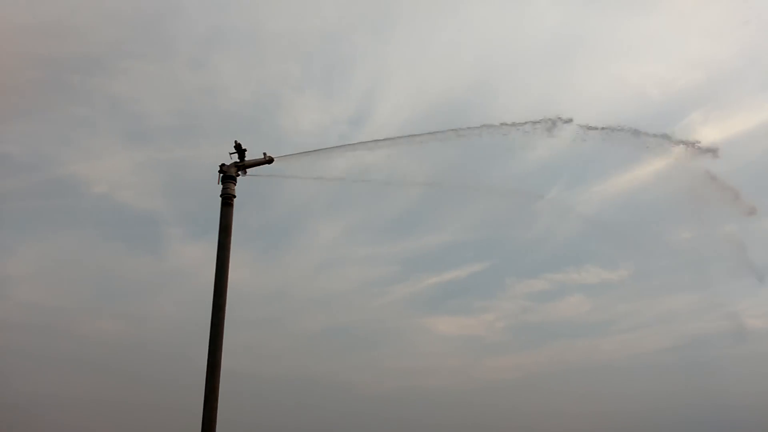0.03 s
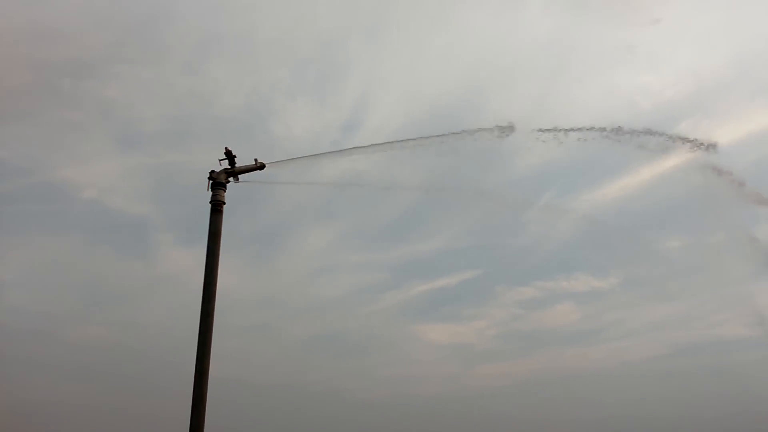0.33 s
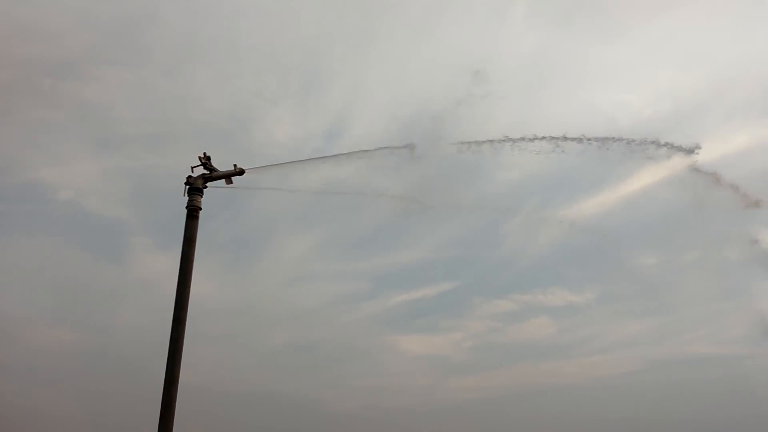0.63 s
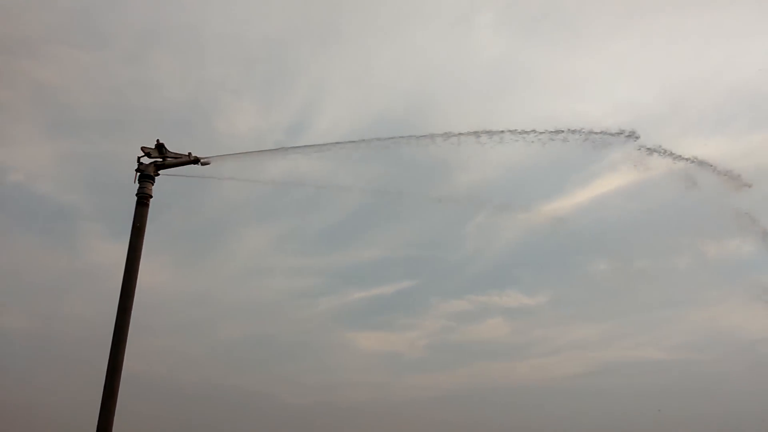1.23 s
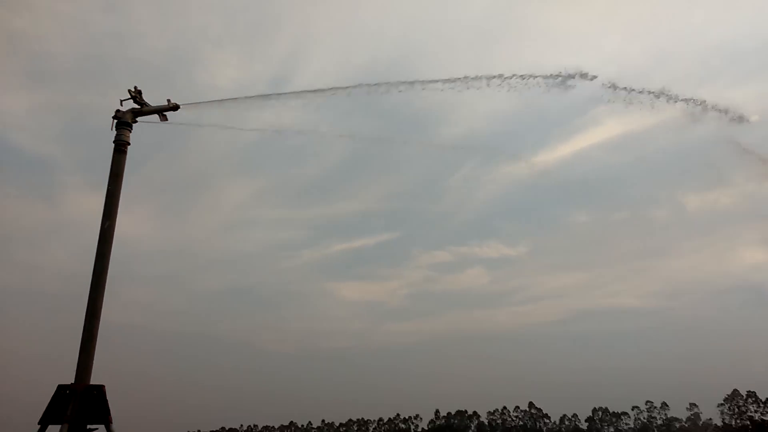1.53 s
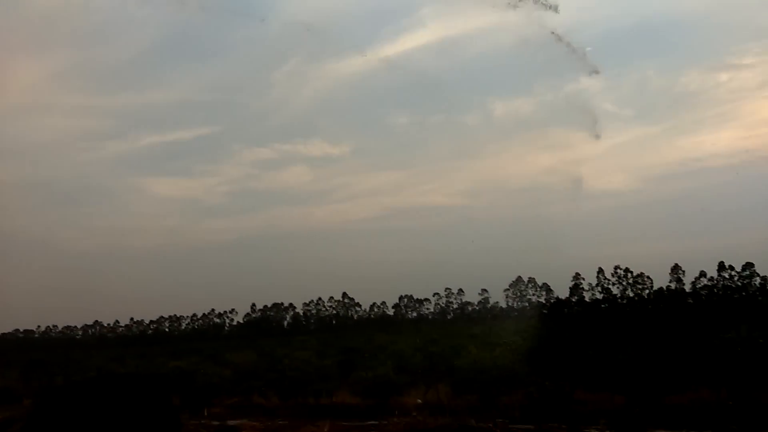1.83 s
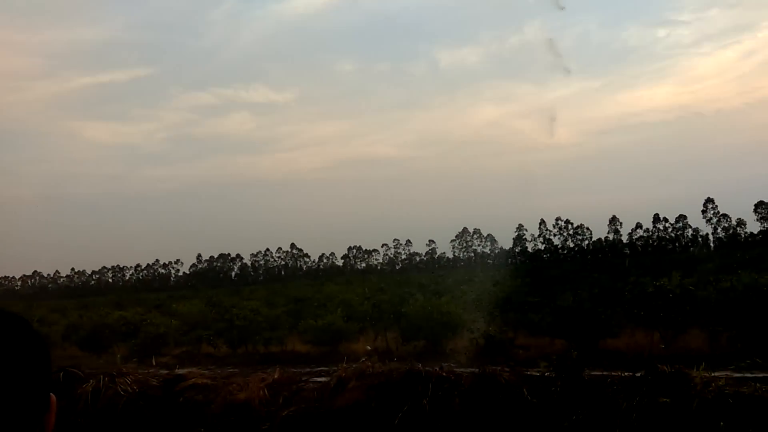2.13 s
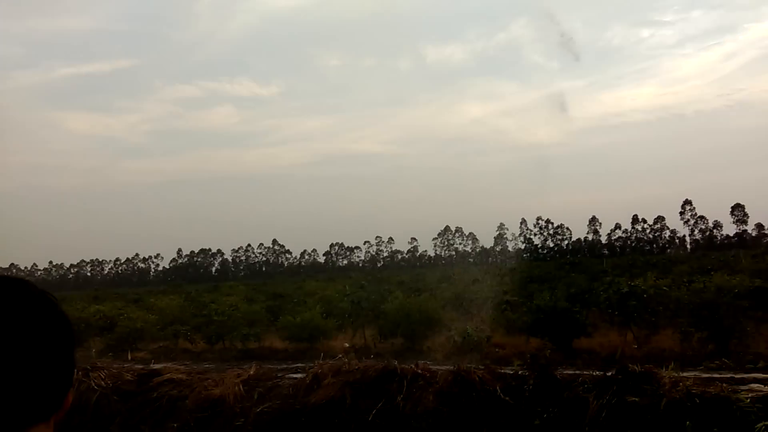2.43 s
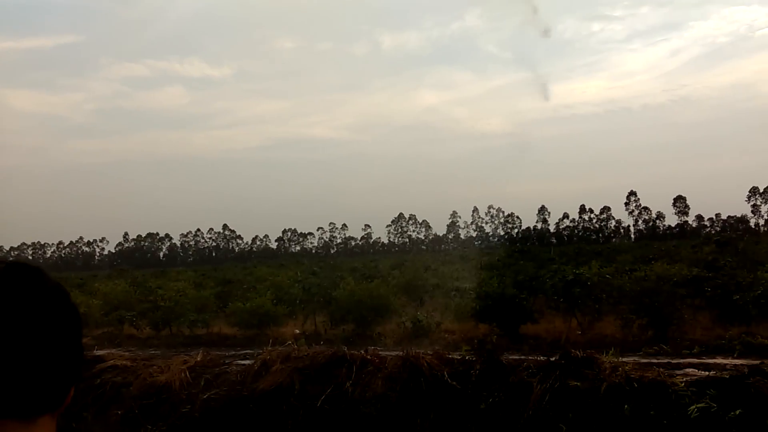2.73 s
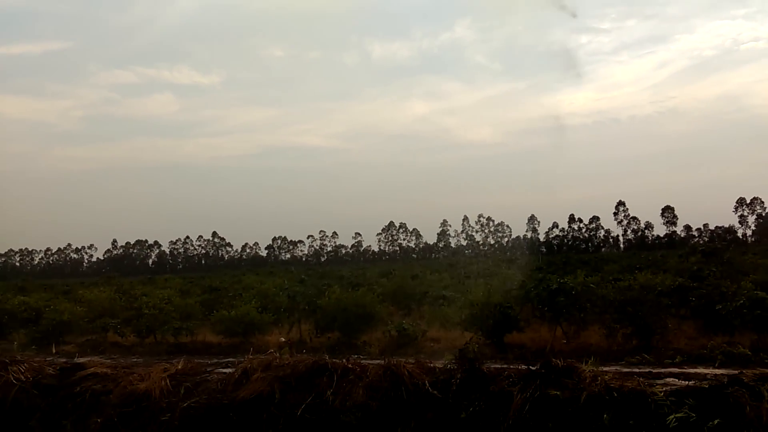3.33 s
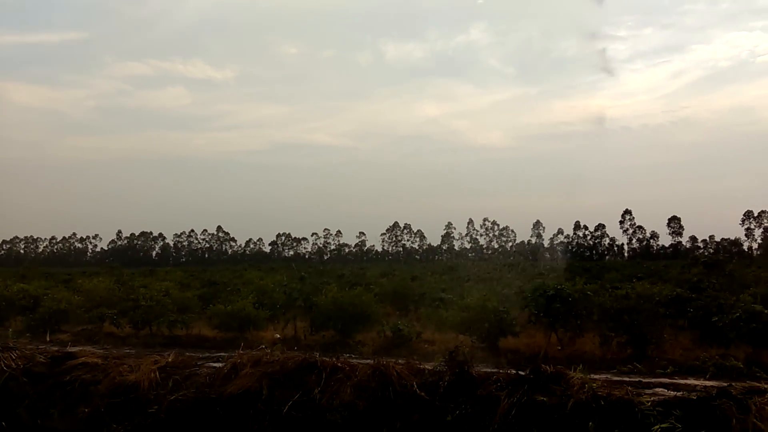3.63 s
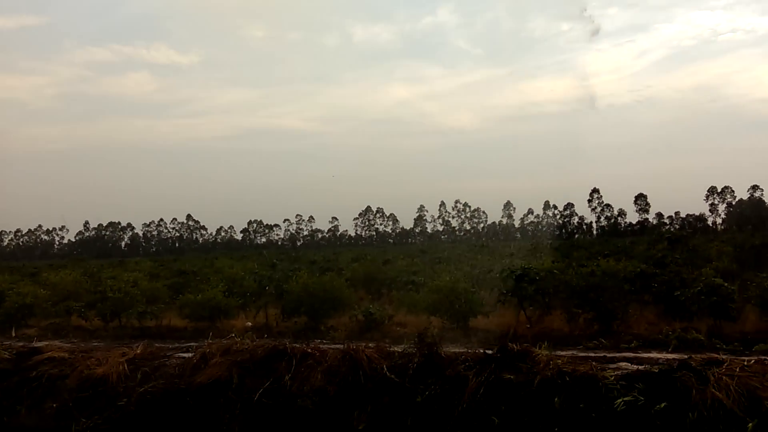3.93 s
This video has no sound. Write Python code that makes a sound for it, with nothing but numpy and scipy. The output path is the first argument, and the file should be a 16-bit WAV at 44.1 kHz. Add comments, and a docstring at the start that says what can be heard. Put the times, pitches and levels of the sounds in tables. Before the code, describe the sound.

An impact sprinkler in an open field strikes about three times a second, each blow a wet slap with a short metallic ring. Its jet hisses throughout, while an engine chugs some way off over a low outdoor rumble.

```python
"""Impact sprinkler in an open field

About three times a second the arm of a big sprinkler on a pole slaps into the jet, strikes the metal
head and rebounds once. Each blow is a noise burst of drops plus the ringing modes of the metal; both
change colour as the head slowly turns away. The jet hisses throughout, the open air rumbles, and a
four-cylinder engine, probably the pump, chugs some way off in harmonics of its cycle rate."""
import sys
import numpy as np
from scipy import signal
from scipy.fft import rfft, irfft
from scipy.io import wavfile

SR = 44100
rng = np.random.default_rng(int(sys.argv[2]) if len(sys.argv) > 2 else 0)


def master(y):
    """Save y as 16-bit WAV."""
    cut = np.clip(np.atleast_2d(y).T, -1, 1)
    pcm = np.round(cut * 32767)  # scale
    wavfile.write(sys.argv[1], SR, pcm.astype(np.int16))


N = 176400
TIME = np.arange(N) / SR
FREQ = np.maximum(np.arange(N // 2 + 1) * SR / N, 1)
LAG_NEAR_S, LAG_TURNED_S, ENGINE_LAG_S = .00042, .00028, .00038   # left channel behind right
CYCLE_HZ = 12.259
ENGINE_CYCLES = (TIME - .0025) * CYCLE_HZ


def from_db(db):
    """Amplitude ratio: a factor of ten per 20 dB."""
    return 10 ** (np.asarray(db) / 20)


def unit_rms(x):
    """Normalisation to unit mean power."""
    return x / np.sqrt(np.mean(x ** 2) + 1e-20)


def spectrum(points):
    """Interpolation of (frequency, level) points on a logarithmic frequency axis."""
    hz, db = np.transpose(points)
    return np.interp(np.log(FREQ), np.log(hz), db)


def coloured(x, curve_db):
    """Minimum-phase filtering: folding the cepstrum gives a gain curve its causal response."""
    cepstrum = irfft(np.log(from_db(curve_db)), N)
    cepstrum[1:N // 2] *= 2
    cepstrum[N // 2 + 1:] = 0
    response = irfft(np.exp(rfft(cepstrum)), N)[:N // 16]
    return signal.fftconvolve(x, response[None], axes=1)[:, :N]


def drift(hz):
    """Random modulation: low-passed noise of unit rms."""
    return unit_rms(irfft(rfft(rng.standard_normal(N)) / (1 + (FREQ / hz) ** 2), N))


def from_right(x, lag_s):
    """Path difference: sound from the right reaches the left channel later."""
    return np.array([irfft(rfft(x) * np.exp(-2j * np.pi * FREQ * lag_s), N), x])


def diffuse_noise(directions=12, max_lag_s=.000458):
    """Diffuse field: noise from all round the horizon is coherent at two points only in the bass."""
    lags = max_lag_s * np.cos(np.pi * (np.arange(directions) + .5) / directions)
    coherence = np.cos(2 * np.pi * FREQ * lags[:, None]).mean(axis=0)
    weights = np.sqrt(np.maximum([1 + coherence, 1 - coherence], 0))
    mid, side = rfft(rng.standard_normal((2, N))) * weights
    return unit_rms(irfft([mid + side, mid - side], N))


def mix(a, b, share):
    """Incoherent signals add in power; b takes the given share."""
    return np.sqrt(1 - share) * a + np.sqrt(share) * b


def ring(force, hz, t60_s):
    """Damped oscillator: a unit impulse starts a decaying sine of height 1."""
    decay, step = from_db(-60 / (t60_s * SR)), 2 * np.pi * hz / SR
    return signal.lfilter([0, np.sin(step)], [1, -2 * decay * np.cos(step), decay ** 2], force + 1e-18)


def burst(age_s, hold_s, t60_s):
    """Exponential decay of power after a sudden onset and a short hold."""
    return (age_s >= 0) * from_db(-60 * np.clip((age_s - hold_s) / t60_s, 0, 2)) ** 2


def turned(time_s, start_s=1.32, end_s=2.16):
    """Uniform rotation of the head, from 0 (near) to 1 (turned away)."""
    return np.clip((time_s - start_s) / (end_s - start_s), 0, 1)


def rebound_delay(start_s):
    """Elastic rebound: the arm lands again 38 ms after a blow, 41 ms once the head has turned."""
    return .038 + .003 * turned(start_s)


# Blows of the arm; the rebound is relative to its blow, the treble to its splash.
# start_s, splash_db, ring_db, rebound_db, treble_db, ping_db
STRIKES = [(-.049, -17.5, -25, -7.5, 0, -26.5), (.312, -16, -23, -14, -2, -27),
           (.673, -16, -18, -12, -2.5, -25), (1.035, -16, -16.5, -11, -1.5, -23.5),
           (1.396, -15.5, -12.5, -14.5, -1, -23), (1.76, -16, -11.5, -13.5, 1, -31),
           (2.123, -19, -19.5, -7.5, -1, -23), (2.482, -20, -20, -5, 0.5, -24),
           (2.849, -18, -21, -9.5, -0.5, -35), (3.214, -19, -21.5, -9, -2, -25.5),
           (3.582, -20, -22, -7, -2, -31), (3.945, -20.5, -23, -8, -1.5, -40)]


def splash_envelopes(entry_s=.0079, entry_rise_db_per_s=2300):
    """Energy decay: the powers of slap, rebound and spray add up blow by blow; treble gain varies."""
    slap, rebound, spray, extra_treble = np.zeros((4, N))
    for start_s, splash_db, _, rebound_db, treble_db, _ in STRIKES:
        age, power = TIME - start_s, from_db(splash_db) ** 2
        entry_db = 2.5 + entry_rise_db_per_s * np.clip(age, -entry_s, 0)
        entry = (age > -entry_s) * (age < 0) * from_db(entry_db) ** 2   # the arm cuts the jet first
        crack = from_db(-5) ** 2 * burst(age, hold_s=.00089, t60_s=.0051)
        slap += power * (entry + crack + burst(age, hold_s=.0043, t60_s=.081))
        rebound_age = age - rebound_delay(start_s)
        rebound += power * from_db(rebound_db) ** 2 * burst(rebound_age, hold_s=.002, t60_s=.048)
        spray += power * from_db(-10.5) ** 2 * burst(age, hold_s=.0043, t60_s=.26)
        extra_treble[age > -entry_s] = from_db(treble_db) - 1
    return slap, rebound, spray, extra_treble


# Splash spectrum before and after the turn: frequency_hz, gain_db
NEAR_SPECTRUM = [(200, -24.5), (550, -6.5), (800, -1.5), (960, -5.5), (1270, 3.5), (1550, 0), (1900, 1.5),
                 (2400, 8), (2950, 3), (3700, 4.5), (4700, 2), (5900, -1), (7200, -7), (10000, -3),
                 (13000, -9), (16000, -26)]
TURNED_SPECTRUM = [(200, -37.5), (550, -2.5), (800, -4.5), (1000, -2), (1300, -2), (1800, 5.5), (2450, 2.5),
                   (2950, 3), (3750, 7.5), (4800, 1.5), (6000, 2.5), (7200, -6.5), (10000, -5.5),
                   (13000, -5), (16000, -20)]
# Splash balance before and after the turn: frequency_hz, left_minus_right_db
NEAR_BALANCE = [(500, -0.5), (1200, 7.5), (2000, 4.5), (2650, -5), (3500, 1), (4400, 1.5), (5600, 1.5),
                (7800, 9.5), (11500, -3), (16000, 21.5)]
TURNED_BALANCE = [(500, 8), (1300, -2.5), (1750, 10), (2500, -16), (3300, 9), (4300, -5), (5000, -10),
                  (7000, -7), (8600, 11.5), (11000, -5.5), (16000, -5.5)]
# Rebound spectrum relative to the splash: frequency_hz, gain_db
REBOUND_SPECTRUM = [(500, 17), (2000, -1), (3300, -2), (5300, 5), (7000, -1.5), (14000, -3.5)]


def splashes(treble_from_hz=8400, mist_top_hz=5560):
    """Atomisation: the arm bursts the jet into drops, a grainy noise partly scattered by the field."""
    slap, rebound, spray, extra_treble = splash_envelopes()
    direct, scattered = rng.standard_normal(N), diffuse_noise()
    grain = from_db(3.5 * drift(hz=527))
    low_pass = signal.butter(2, mist_top_hz, fs=SR, output="sos")
    mist = signal.sosfilt(low_pass, diffuse_noise() * np.sqrt(spray) + 1e-18)
    near = (1 - turned(TIME), LAG_NEAR_S, NEAR_SPECTRUM, NEAR_BALANCE)
    away = (turned(TIME), LAG_TURNED_S, TURNED_SPECTRUM, TURNED_BALANCE)
    out = 0
    for weight, lag_s, colour, balance in (near, away):
        drops = unit_rms(mix(from_right(direct, lag_s), scattered, share=.51) * grain)
        treble = irfft(rfft(drops) * (FREQ > treble_from_hz), N)
        first_slap = (drops + extra_treble * treble) * np.sqrt(slap)
        second_slap = coloured(drops * np.sqrt(rebound), spectrum(REBOUND_SPECTRUM))
        water = first_slap + second_slap + mist
        left = coloured(water[:1], spectrum(colour) + spectrum(balance) / 2)
        right = coloured(water[1:], spectrum(colour) - spectrum(balance) / 2)
        out += weight * np.vstack([left, right])
    return out


def struck_mode(start_s, level_db, hz, t60_s, pan_db, scatter_db=1.5):
    """Impulse excitation of one mode, with random phase and level at each blow."""
    impulses = np.zeros((2, N + 2 * SR))
    onset_s = 1 + start_s + rng.random(len(start_s)) / hz   # one second of run-in
    lag_s = LAG_NEAR_S + turned(start_s) * (LAG_TURNED_S - LAG_NEAR_S)
    level_db = level_db + scatter_db * rng.standard_normal(len(start_s))
    impulses[0, ((onset_s + lag_s) * SR).astype(int)] = from_db(level_db + pan_db / 2)
    impulses[1, (onset_s * SR).astype(int)] = from_db(level_db - pan_db / 2)
    return ring(impulses, hz, t60_s)[:, SR:SR + N]


# Modes of arm and head: pitch_hz, near_db, turned_db, t60_s, left_minus_right_db, rebound_extra_db
METAL_MODES = [(1860, -22, -24, 0.094, -21, -6), (2067, -29, -16, 0.12, 25.5, -1),
               (2230, -14, -15, 0.065, 24, -8), (2314, -13, -56, 0.043, 8, 10),
               (2518, -13.5, -4.5, 0.16, -3, -1.5), (2660, -18, -28.5, 0.13, -4, 8),
               (2930, -24, -32, .13, 6, 4), (3310, -40, -14.5, 0.045, 22, 9), (3656, -24, 2, 0.022, 0, -5),
               (3875, -14, -15, .05, -7, 11), (3980, -31, -13, 0.053, 11, -4),
               (4556, -0.5, -8, 0.035, 10, 0), (5000, -16, -10, 0.04, -2, 13)]


def metal_head(radiates_from_hz=1050):
    """Modal ringing with directivity: which modes carry depends on where the struck head points."""
    start_s, _, ring_db, rebound_db, _, ping_db = np.transpose(STRIKES)
    hits_s = np.r_[start_s, start_s + rebound_delay(start_s)]
    out = struck_mode(start_s, ping_db, hz=2342, t60_s=.19, pan_db=-3)   # this ping rings longest
    for hz, near_db, turned_db, t60_s, pan_db, extra_db in METAL_MODES:
        blow_db = ring_db + near_db + turned(start_s) * (turned_db - near_db)
        hits_db = np.r_[blow_db, blow_db + rebound_db + extra_db]
        out += struck_mode(hits_s, hits_db, hz, t60_s, pan_db)
    # A small body radiates little bass.
    return signal.sosfilt(signal.butter(2, radiates_from_hz, "high", fs=SR, output="sos"), out)


# Spectra of the stream and of its fine mist: frequency_hz, relative_db
HISS_SPECTRUM = [(500, -17.5), (1000, -1.5), (1600, 2.5), (2400, -2), (3200, -0.5), (4500, -6), (5600, -6),
                 (7400, -12.5), (9500, -7.5), (12500, -10.5), (16000, -11)]
FIZZ_SPECTRUM = [(5000, -30), (8000, 1), (10000, -20), (12700, 14), (16000, -5)]


def jet():
    """Flow noise: the stream hisses, mist fizzes unevenly, and the flow keeps the head faintly ringing."""
    hiss = coloured(diffuse_noise(), spectrum(HISS_SPECTRUM))
    hiss *= from_db(1.07 * drift(hz=60))
    fizz = coloured(diffuse_noise(), spectrum(FIZZ_SPECTRUM))
    fizz *= from_db(6 * drift(hz=150) + 2 * drift(hz=4.3))
    singing = unit_rms(ring(diffuse_noise(), hz=2365, t60_s=.08))
    return from_db(-46) * unit_rms(hiss) + from_db(-64.5) * unit_rms(fizz) + from_db(-62) * singing


# Four unevenly spaced thumps in each engine cycle: cycle_fraction, thump_db, clatter_db
THUMPS = [(.125, -7, -9), (.455, -4, 0), (.71, 0, 0), (.88, -11, -12)]
# Exhaust harmonics of the cycle rate: harmonic_number, relative_db
EXHAUST_HARMONICS = [(1, -52), (2, -68), (3, -20), (4, -12.5), (5, -13.5), (6, -69), (7, -33), (8, -2.5),
                     (9, -37), (10, -32), (11, -4), (12, 4), (13, -6), (14, -21), (15, 0.5), (16, -3),
                     (17, -9.5), (18, -6), (19, -17), (20, -10), (21, -8.5), (22, -13), (23, -49),
                     (24, -31.5), (25, -16), (26, -44), (27, -28), (28, -15.5), (29, -43), (30, -23),
                     (31, -22), (32, -15.5)]


def engine_exhaust():
    """Fourier series of a chug: the exhaust sets each harmonic's level, the thumps set its phase."""
    place, thump_db, _ = np.transpose(THUMPS)
    chug = 0
    for harmonic, level_db in EXHAUST_HARMONICS:
        phase = np.angle(np.sum(from_db(thump_db) * np.exp(-2j * np.pi * harmonic * place)))
        chug -= from_db(level_db) * np.cos(2 * np.pi * harmonic * ENGINE_CYCLES + phase)
    return from_db(-35) * from_right(unit_rms(chug), ENGINE_LAG_S)


# Spectrum of the mechanical clatter: frequency_hz, relative_db
CLATTER_SPECTRUM = [(100, -8.5), (200, 19.5), (290, -16), (390, -4), (480, 6.5), (570, 5), (640, -7),
                    (730, 6), (900, -10.5), (1500, -10.5), (4000, -49)]


def engine_clatter(puff_width_s=.006):
    """Pulsed noise: each thump gives a puff of clatter, partly alike every cycle, and a ringing knock."""
    place, _, clatter_db = np.transpose(THUMPS)
    from_thump_s = ((ENGINE_CYCLES - place[:, None] + .5) % 1 - .5) / CYCLE_HZ
    puffs = from_db(clatter_db) @ np.exp(-.5 * (from_thump_s / puff_width_s) ** 2)
    noise = mix(from_right(rng.standard_normal(N), ENGINE_LAG_S), diffuse_noise(), share=.9)
    repeating = noise[:, (ENGINE_CYCLES % 1 * SR / CYCLE_HZ).astype(int) + N // 2]
    clatter = coloured(mix(noise, repeating, share=.49) * puffs, spectrum(CLATTER_SPECTRUM))
    knock = ring(noise * puffs, hz=720, t60_s=.025)
    return from_db(-49) * unit_rms(clatter) + from_db(-56.5) * unit_rms(knock)


# Spectrum of the open air: frequency_hz, relative_db
RUMBLE_SPECTRUM = [(20, -22), (35, -26), (60, -5), (80, 3), (110, -1.5), (180, 7.5), (300, -8), (500, -2.5),
                   (750, -10), (1000, -19), (3000, -57)]


def open_air():
    """Ambient noise: a low, even rumble arrives from all directions."""
    return from_db(-44) * unit_rms(coloured(diffuse_noise(), spectrum(RUMBLE_SPECTRUM)))


def scene():
    """Superposition: the pressures of sprinkler, engine and open air add."""
    return splashes() + metal_head() + jet() + engine_exhaust() + engine_clatter() + open_air()


def record(dry):
    """Band limiting: a steep low-pass is 70 dB down from 16.5 kHz."""
    return signal.sosfilt(signal.cheby2(16, 70, 16500, fs=SR, output="sos"), dry)


dry = scene()
out = record(dry)
master(out)
```